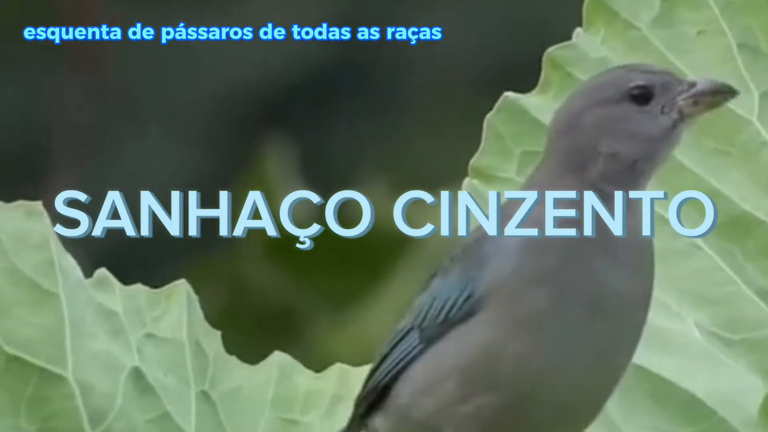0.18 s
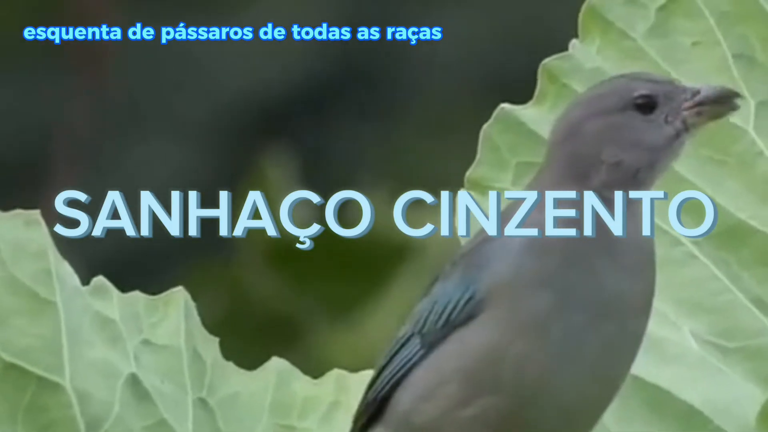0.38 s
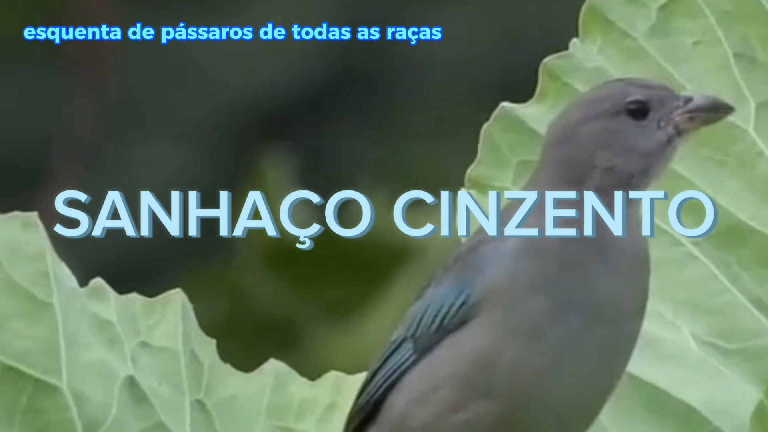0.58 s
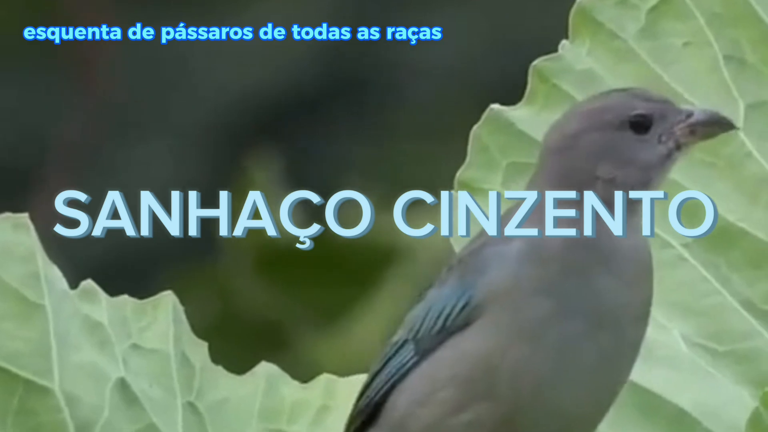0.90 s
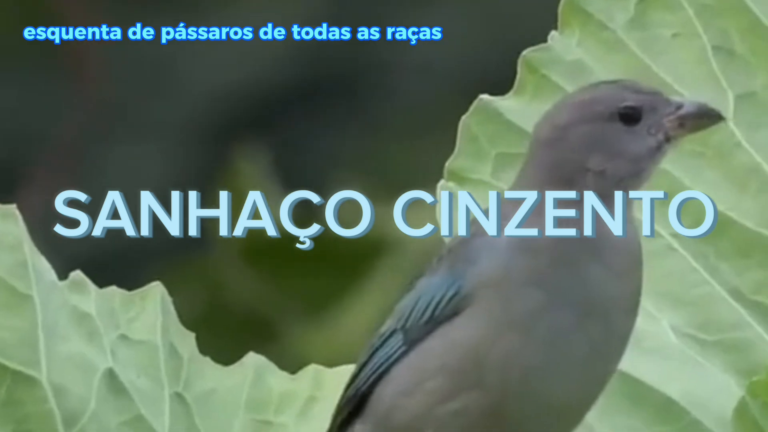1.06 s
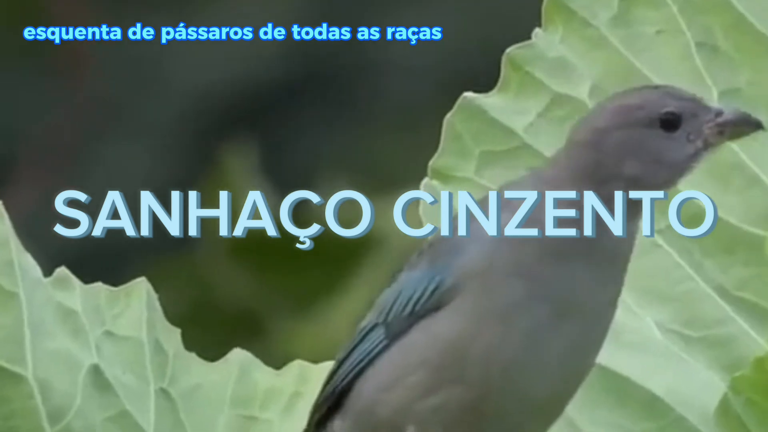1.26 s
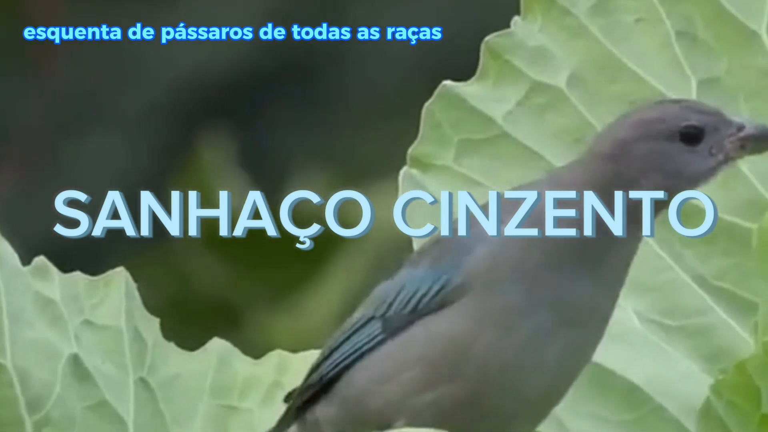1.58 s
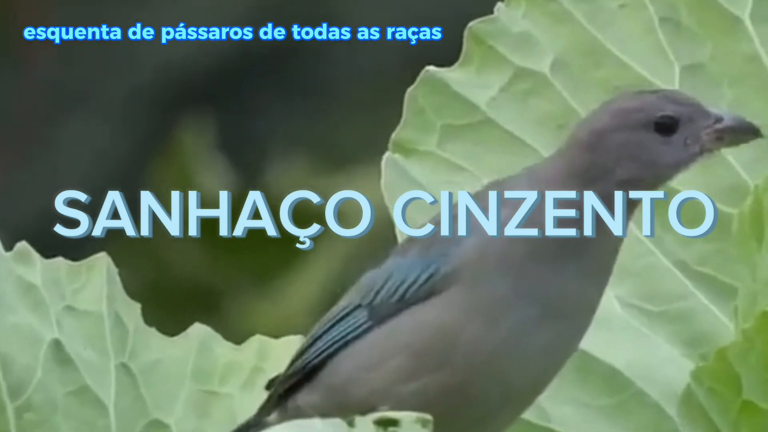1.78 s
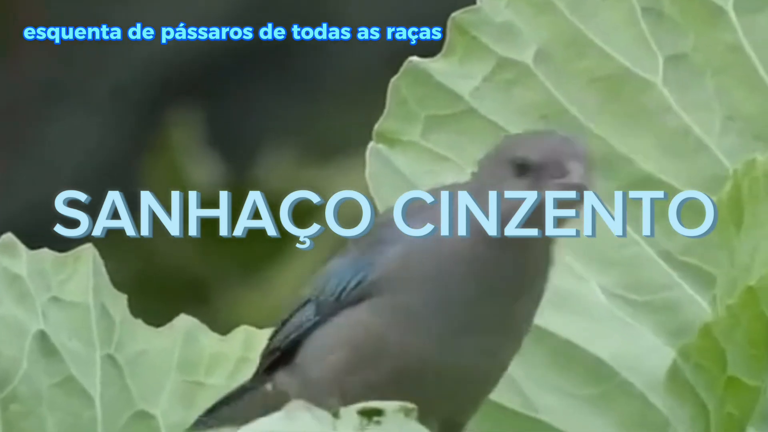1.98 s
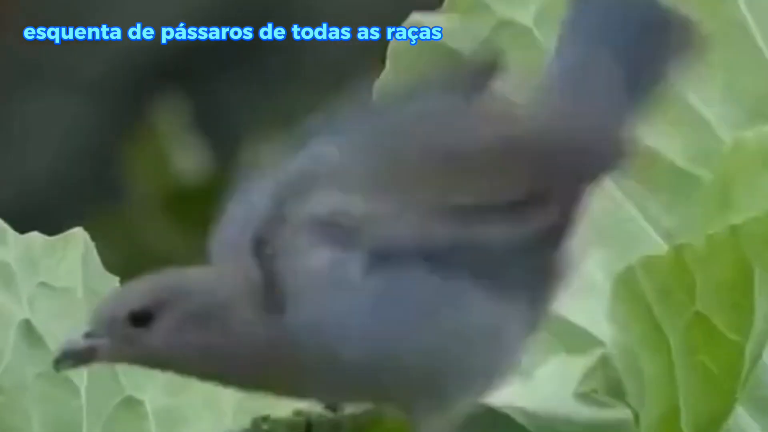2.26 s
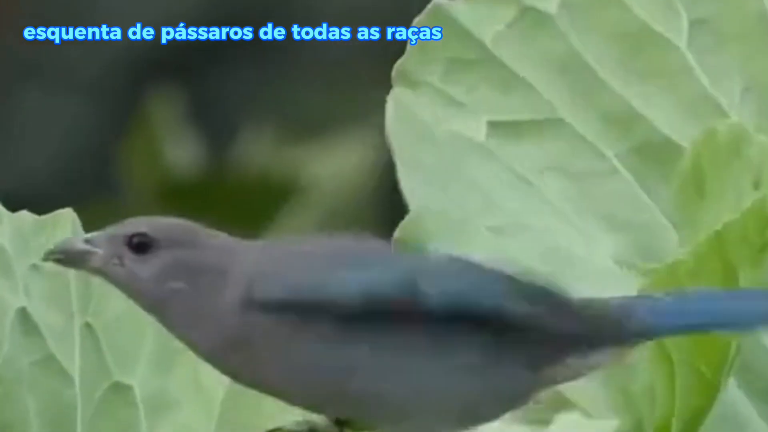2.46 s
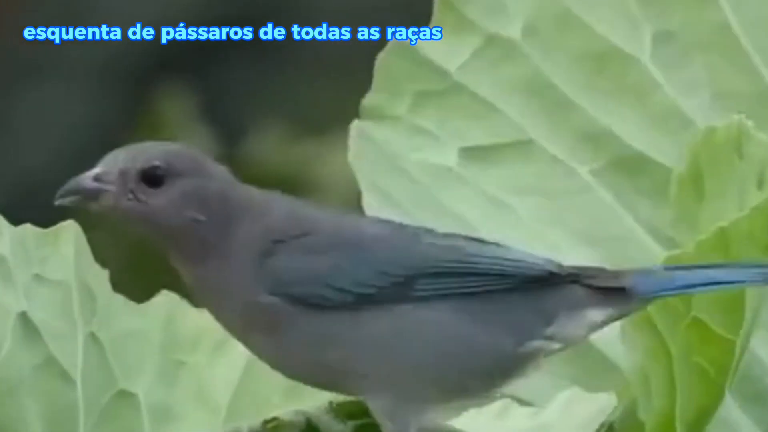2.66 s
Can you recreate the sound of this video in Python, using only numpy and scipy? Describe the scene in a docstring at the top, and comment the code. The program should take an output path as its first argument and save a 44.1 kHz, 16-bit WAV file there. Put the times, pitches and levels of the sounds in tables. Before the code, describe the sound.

A small songbird sings close by outdoors. Quick squeaky whistles and chirps fill 0-0.55 s, then a long high arching note at 0.6-0.9. A chirp at 1.0 leads to a rising whistle until 1.4. Scratchy chirps come at 1.55, a buzzy trill at 1.7-1.87, a level whistle at 2.0-2.2, and falling chirps at 2.35-2.55 and 2.75. Short leafy echoes, faint far dove coos, low traffic rumble, wavering hiss.

```python
"""A small songbird sings close by among leaves: gliding whistles, short two-toned chirps, a long arching
note and a buzzy trill, with scratchy rasps and clicky flicks. The notes are tones that follow tables
of pitch and level; rasps are tangles of tiny falling strokes. Noise tails smear the bird with garden echoes.
A far dove coos faintly, heard only through those echoes, over low traffic rumble and hiss made of shaped noise.
Two thin, flickering copies of the whole sound hang shifted up in the treble."""
import sys
import numpy as np
from scipy import signal
from scipy.fft import rfft, irfft, next_fast_len
from scipy.io import wavfile
from scipy.ndimage import uniform_filter1d, map_coordinates

SR = 44100
rng = np.random.default_rng(int(sys.argv[2]) if len(sys.argv) > 2 else 0)


def volts_from_decibels(level):
    """Turn decibel levels (scalar or array-like) into linear amplitude factors."""
    exponent = np.asarray(level, float) / 20
    return 10 ** exponent


def file_out(sig):
    """Save sig as 16-bit WAV at sys.argv[1]."""
    # one column per channel
    cols = np.atleast_2d(sig).T
    # limit, then scale
    lim = np.clip(cols, -1, 1)
    pcm = np.round(lim * 32767).astype(np.int16)
    wavfile.write(sys.argv[1], SR, pcm)


N = 123480  # length of the scene in samples

# upper cutoff of the bird tones, a steep drop near 9 kHz: (pitch_hz, gain_db)
TONE_CUTOFF = [(8800, 1), (9600, -33)]


def unit(x):
    """Scales a sound to an rms of 1."""
    return x / np.sqrt(np.mean(x ** 2) + 1e-20)


def along(points, hz):
    """Reads a curve of (Hz, value) points, with frequency on a log axis."""
    point_hz, value = np.transpose(points)
    return np.interp(np.log(hz + 1), np.log(point_hz + 1), value)


def wobble(rate):
    """A smooth random curve through `rate` random points a second."""
    knots = rng.standard_normal(int(N * rate / SR) + 4)
    return map_coordinates(knots, [np.arange(N) * rate / SR])


def coloured(x, spectrum):
    """Filters a sound by a spectrum of (Hz, dB) points."""
    size = next_fast_len(N + 8192)
    gain = volts_from_decibels(along(spectrum, np.fft.rfftfreq(size, 1 / SR)))
    return irfft(rfft(x, size) * gain, size)[:N]


def controls(rows):
    """Gives a note's span, its faded ends and one value per sample for each column."""
    edge_s = .003
    s, *columns = np.transpose(rows)
    span = slice(round(s[0] * SR), round(s[-1] * SR))
    t = np.arange(N)[span] / SR
    ends = np.clip(np.minimum(t - s[0], s[-1] - t) / edge_s, 0, 1)
    # the root of 2 makes a level in the tables the rms of its sine
    return span, np.sqrt(2) * ends, [np.interp(t, s, column) for column in columns]


def strokes(s, hz, db, length_s, fall_hz_per_s):
    """Very short tones that drop in pitch, one centred on each time s."""
    t = np.arange(-SR // 50, SR // 50) / SR
    swell = volts_from_decibels(db)[:, None] * np.exp(-(t / length_s) ** 2)
    tones = swell * np.sin(2 * np.pi * (hz[:, None] - fall_hz_per_s * t / 2) * t)
    at = np.clip(np.round((s[:, None] + t) * SR).astype(int), 0, N)
    return np.bincount(at.ravel(), tones.ravel(), N + 1)[:N]


def turning(hz):
    """The running phase of a tone: its pitch added up over time, in radians."""
    return 2 * np.pi * np.cumsum(hz) / SR


def pitch_shiver():
    """Small fast unsteadiness of pitch, in Hz."""
    return 8 * wobble(250)


def whistles():
    """Pure whistles: each is a single sine that glides in pitch and level."""
    # one table a note, before the cutoff: (time_s, pitch_hz, level_db)
    whistle_notes = [
        [(0, 2536, -34), (.022, 2370, -45)],
        [(.068, 3570, -48), (.081, 4250, -34), (.087, 4034, -46), (.096, 1850, -43)],
        [(.203, 7450, -38), (.211, 6300, -25.5), (.22, 5570, -16.5), (.238, 4440, -31.5)],
        [(.208, 7600, -25), (.222, 7360, -27), (.238, 5960, -17), (.252, 5200, -19), (.265, 4640, -25.5),
         (.29, 4250, -33.5)],
        [(.348, 4220, -32), (.37, 4660, -24.5), (.385, 5500, -17), (.4, 7200, -28.5)],
        [(.384, 4970, -19.5), (.402, 6120, -25.5)],
        [(.491, 4340, -25), (.5, 4360, -21.5), (.52, 3690, -31), (.538, 3580, -25)],
        [(1.143, 3740, -35.5), (1.16, 4330, -22.5), (1.176, 4483, -33), (1.19, 4685, -13), (1.215, 4793, -12.5),
         (1.245, 4907, -26), (1.28, 5150, -13.5), (1.35, 5493, -20), (1.38, 5810, -11), (1.415, 6760, -33.5)],
        [(1.688, 6030, -32.5), (1.705, 6183, -15.5), (1.745, 6217, -16.5), (1.8, 5670, -42.5)],
        [(1.96, 5140, -34), (1.99, 5075, -20.5), (2.045, 4898, -11), (2.12, 4933, -13.5), (2.163, 4916, -19.5),
         (2.182, 5010, -37.5)],
    ]
    out, shiver_hz = np.zeros(N), pitch_shiver()
    for rows in whistle_notes:
        span, ends, (hz, db) = controls(rows)
        out[span] += ends * volts_from_decibels(db) * np.sin(turning(hz + shiver_hz[span]))
    return coloured(out, TONE_CUTOFF)


def chirps():
    """Two-toned chirps: a gliding tone with a strong octave and a weak third partial, all husky."""
    # one table a note, before huskiness and cutoff: (time_s, pitch_hz, level_db, octave_level_db)
    chirp_notes = [
        [(.12, 3240, -29, -38), (.128, 2884, -35.5, -26.5), (.14, 2303, -34.5, -30), (.155, 1645, -31, -46)],
        [(.254, 2987, -37, -33), (.266, 2760, -34, -36), (.282, 2460, -36.5, -37)],
        [(.455, 2009, -42.5, -37.5), (.474, 2256, -36.5, -35.5), (.486, 2905, -28, -26)],
        [(1.0, 2753, -46, -35), (1.01, 2784, -31, -32.5), (1.025, 3010, -46, -22), (1.04, 3087, -30.5, -14),
         (1.062, 3420, -37, -22.5), (1.085, 3625, -26.5, -31.5)],
        [(1.537, 4096, -25, -64), (1.551, 3440, -30, -37), (1.562, 2400, -31, -29.5),
         (1.572, 2390, -39.5, -21.5)],
        [(1.578, 2732, -32, -21.5), (1.591, 2990, -28, -13.5), (1.609, 3272, -31.5, -25.5),
         (1.625, 3640, -27.5, -45)],
        [(2.315, 2410, -45, -43), (2.34, 2980, -58, -68)],
        [(2.345, 3750, -40, -52), (2.36, 3780, -34, -84), (2.41, 3577, -30, -45), (2.44, 3350, -29.5, -32),
         (2.47, 3354, -37, -27), (2.492, 3204, -26.5, -19), (2.51, 2996, -31.5, -21.5),
         (2.532, 2435, -41, -35.5)],
        [(2.71, 2970, -70, -44), (2.732, 2173, -54, -33)],
        [(2.722, 3244, -51, -36), (2.745, 2290, -35, -40)],
        [(2.736, 3060, -53, -42), (2.755, 3078, -42, -34), (2.77, 2810, -43, -43)],
    ]
    third_db = -9  # third partial compared with the weaker of the other two
    out, shiver_hz = np.zeros(N), pitch_shiver()
    husk_db = 5 * wobble(200)  # fast unevenness of level
    for rows in chirp_notes:
        span, ends, (hz, db, octave_db) = controls(rows)
        turn = turning(hz + shiver_hz[span])
        tones = volts_from_decibels(db) * np.sin(turn) + volts_from_decibels(octave_db) * np.sin(2 * turn)
        tones += volts_from_decibels(np.minimum(db, octave_db) + third_db) * np.sin(3 * turn)
        out[span] += ends * volts_from_decibels(husk_db[span]) * tones
    return coloured(out, TONE_CUTOFF)


def trill():
    """The long arching note and the buzzy trill: tones whose pitch and strength flutter fast and unevenly."""
    # both tables, before pulsing and cutoff: (time_s, centre_hz, level_db, swing_hz)
    arching_note = [(0.616, 5910, -25.5, 4.7), (0.626, 5830, -18, 5.3), (0.681, 6153, -12.5, 21),
                    (0.708, 6446, -11.5, 73), (0.736, 6520, -18.5, 260), (0.773, 6845, -14, 130),
                    (0.807, 6583, -13.5, 49), (0.849, 5696, -15, 19), (0.888, 5030, -17, 44),
                    (0.916, 3870, -29.5, 20)]
    trill_note = [(1.716, 8330, -33.5, 302), (1.745, 8340, -20, 400), (1.789, 8060, -24, 400),
                  (1.809, 7410, -16, 402), (1.838, 6963, -14.5, 347), (1.867, 6800, -17, 250)]
    mean_rate_hz, rate_jitter, roughness = 170, 0.61, 0.45
    pulse_db_per_khz = 14.5  # pulsing grows with the swing
    octave_db = -6  # octave compared with the tone at 1 kHz of swing
    out, upper = np.zeros((2, N))
    beat = turning(mean_rate_hz * (1 + rate_jitter * wobble(60)))
    flutter = np.sin(beat) + roughness * wobble(800)
    for rows in arching_note, trill_note:
        span, ends, (hz, db, swing_hz) = controls(rows)
        pulse_db = pulse_db_per_khz * np.abs(swing_hz) / 1000 * (np.cos(beat[span]) - .5)
        turn = turning(hz + swing_hz * flutter[span])
        strength = ends * volts_from_decibels(db + pulse_db)
        out[span] += strength * np.sin(turn)
        # the octave grows with the swing squared
        upper[span] += strength * volts_from_decibels(octave_db) * (swing_hz / 1000) ** 2 * np.sin(2 * turn)
    return coloured(out, TONE_CUTOFF) + upper


def rasps():
    """Short scratchy puffs where notes break off: a dense tangle of quick falling strokes over throat noise."""
    # each puff: (centre_s, level_db, length_s)
    puffs = [(0.088, -36, 0.017), (0.13, -31.5, 0.039), (1.081, -29, 0.062), (1.519, -38.5, 0.0085),
             (1.565, -31.5, 0.071), (1.626, -28.5, 0.039), (2.757, -28.5, 0.055)]
    # tone colour of the puffs: (pitch_hz, relative_level_db)
    rasp_colour = [(1200, -21), (2200, -17.5), (3300, -5.5), (4300, -15.5), (6000, -11.5), (8200, -7),
                   (15500, -18.5)]
    low_hz, high_hz = 2100, 12000
    breath_db = -5  # throat noise compared with the strokes, before colouring
    t = np.arange(N) / SR
    shape = sum(volts_from_decibels(db) * np.exp(-(2 * (t - s) / length) ** 2) for s, db, length in puffs)
    when, pitch, softness = rng.random(size=(4000, 3)).T
    stroke_hz = low_hz * (high_hz / low_hz) ** pitch
    tangle = strokes(when * N / SR, stroke_hz, -10 * softness, length_s=.004, fall_hz_per_s=90000)
    scratch = unit(tangle) + volts_from_decibels(breath_db) * rng.standard_normal(N)
    return shape * unit(coloured(scratch, rasp_colour))


def flicks():
    """Clicky flicks: tones that drop steeply within a few milliseconds."""
    # each flick: (centre_s, centre_hz, peak_level_db)
    flick_list = [(.091, 3240, -26.5), (.541, 3910, -17), (1.083, 6240, -14.5), (1.612, 7870, -18.5),
                  (1.628, 5910, -18)]
    return strokes(*np.transpose(flick_list), length_s=.0025, fall_hz_per_s=600000)


def garden(bird, far):
    """Leaves and walls answer: noise tails that die away, with a new echo pattern every fifth of a second."""
    # how long echoes ring at each pitch: (pitch_hz, time_to_fall_60_db_s)
    ring_time = [(3000, 0.4), (6000, 0.29), (9000, 0.28)]
    echo_db, lag_s = -4, 0.0048
    # the bird's echo send is turned down for 0.3 s, so the level whistle leaves a faint tail
    dip_start_s, dip_db = 1.95, -10.5
    t = np.arange(N) / SR
    dip = (t > dip_start_s) & (t < dip_start_s + .3)
    sent = bird * volts_from_decibels(dip_db * dip) + far
    out, step = np.zeros(N + SR), SR // 5
    for i in range(0, N, step):
        hz, tail_t, z = signal.stft(rng.standard_normal(SR // 2), SR, nperseg=256)
        decay = volts_from_decibels(-60 * tail_t / along(ring_time, hz)[:, None])
        tail = signal.istft(z * decay, SR, nperseg=256)[1]
        # neighbouring stretches overlap and crossfade
        start = max(i - step, 0)
        fade = np.hanning(2 * step)[max(step - i, 0):]
        part = sent[start:i + step]
        wet = signal.fftconvolve(part * fade[:len(part)], tail / np.linalg.norm(tail))
        out[start + round(lag_s * SR):][:len(wet)] += wet
    return volts_from_decibels(echo_db) * out[:N]


def dove():
    """Far soft coos: swelling sines made husky by a wavering phase."""
    # each coo, peak level before the echoes: (start_s, length_s, pitch_hz, level_db)
    coos = [(1.294, 0.096, 739, -44), (1.518, 0.11, 723.3, -34), (1.732, 0.11, 661, -37),
            (2.548, 0.063, 736, -36.5)]
    t = np.arange(N) / SR
    out = np.zeros(N)
    for s, length, hz, db in coos:
        swell = np.exp(-(2 * (t - s - length / 2) / length) ** 2)
        out += volts_from_decibels(db) * swell * np.sin(2 * np.pi * (hz * t + 0.41 * wobble(35)))
    return out


def noise_bed(level, colour):
    """Random noise with a given tone colour and a level that changes over time."""
    level_db = np.interp(np.arange(N) / SR, *np.transpose(level))
    return volts_from_decibels(level_db) * unit(coloured(rng.standard_normal(N), colour))


def traffic():
    """Low traffic rumble: noise weighted toward the bass."""
    # loudness over time: (time_s, level_db)
    rumble_level = [(0, -43), (1, -47), (2.8, -44.5)]
    # tone colour: (pitch_hz, relative_level_db_per_hz)
    rumble_colour = [(25, -37), (60, 3.5), (95, -0.5), (190, -12.5), (520, -14.5), (1800, -23), (2600, -48)]
    return noise_bed(rumble_level, rumble_colour)


def hiss():
    """A hiss that comes and goes: noise weighted toward the treble."""
    # loudness over time: (time_s, level_db)
    hiss_level = [(0, -36.5), (.055, -48.5), (.22, -38.5), (.6, -44.5), (.7, -50), (1.28, -68),
                  (1.5, -56.5), (1.53, -42.5), (2.06, -60.5), (2.3, -73.5), (2.33, -43.5), (2.7, -56)]
    # tone colour: (pitch_hz, relative_level_db_per_hz)
    hiss_colour = [(1500, -56), (2200, -2.5), (6000, 0.5), (9000, -4.5), (15800, -30)]
    return noise_bed(hiss_level, hiss_colour)


def shadows(x):
    """The sound again, moved up by two fixed steps in Hz, faint and flickering."""
    # where each of the two shadows lands, one table each: (pitch_hz, gain_db)
    landing = [
        [(7500, -100), (7900, -17), (9500, -33.5), (11500, -25.5), (12200, -60.5), (14200, -28.5),
         (15000, -97.5)],
        [(12300, -95), (12700, -21), (14000, -30), (14600, -19.5), (15500, -27.5), (16000, -97)],
    ]
    shifts_hz = 5512.5, 9646.9
    flicker_shares = 0.91, 0.12  # share of fast random flicker
    squeeze = 0.24  # quiet notes cast a relatively stronger shadow
    t = np.arange(N) / SR
    # the complex form of a sound lets all its pitches move up by the same number of Hz
    whole = signal.hilbert(x, next_fast_len(N))[:N]
    whole = whole / (uniform_filter1d(abs(whole), size=800) + .001) ** squeeze
    out = np.zeros(N)
    for hz, land, share in zip(shifts_hz, landing, flicker_shares):
        flicker = 1 - share + share * (wobble(440) + 1j * wobble(310))
        moved = whole * np.exp(2j * np.pi * hz * t) * flicker
        out += coloured(moved.real, land)
    return out


def scene():
    """The bird, the garden echoes of bird and dove, and the background."""
    bird = whistles() + chirps() + trill() + rasps() + flicks()
    echoes = garden(bird, dove())
    return (bird + echoes + traffic() + hiss())[None]


def band_limit(x):
    """A steep low-pass at the top of the band."""
    return signal.sosfilt(signal.butter(12, 15950, fs=SR, output="sos"), x)


def record(dry):
    """Adds the treble shadows to the scene and finishes the mix."""
    mix = dry + shadows(dry[0])
    return band_limit(mix)


dry = scene()
out = record(dry)
file_out(out)
```